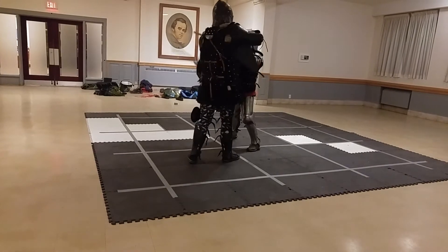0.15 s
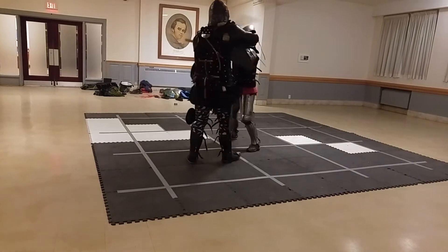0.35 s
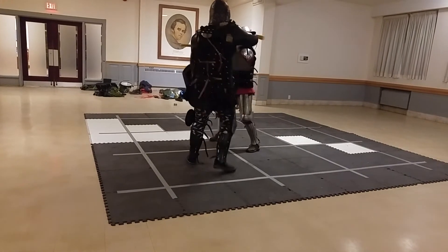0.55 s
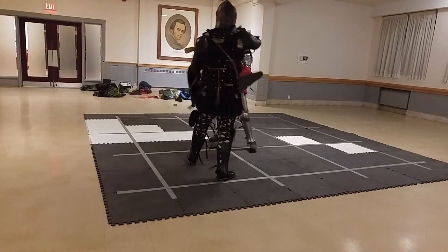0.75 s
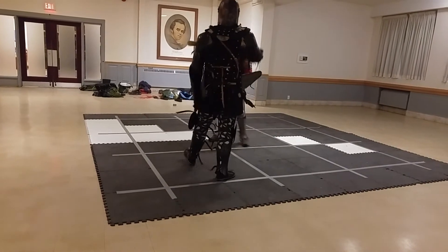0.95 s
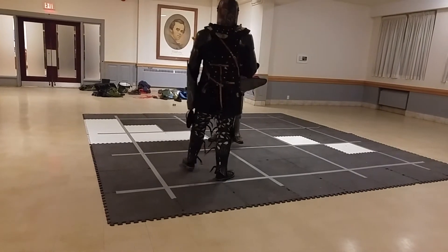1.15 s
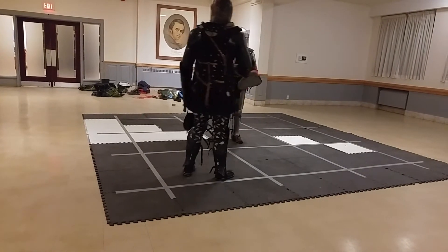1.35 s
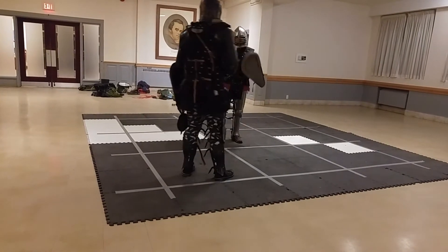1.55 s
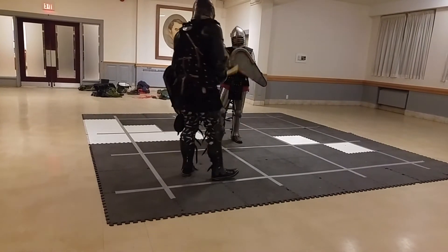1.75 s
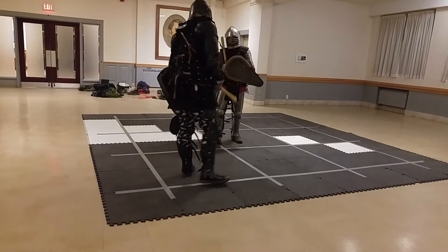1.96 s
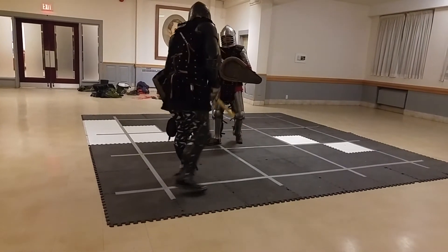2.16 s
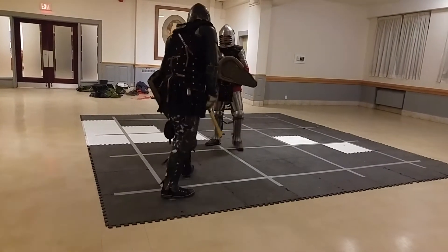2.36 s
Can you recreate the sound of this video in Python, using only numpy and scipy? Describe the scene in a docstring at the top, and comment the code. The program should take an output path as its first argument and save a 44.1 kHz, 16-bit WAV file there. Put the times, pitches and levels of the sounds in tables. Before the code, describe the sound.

Steel plate armour clanks and chatters in an echoing hall. Light jingling and small clinks lead to a hard, bright metal blow at 0.35 s, overloading the microphone, with a hollow thud and low buffet. Ringing fades over a heavy step near 0.5 s. A duller shield knock lands around 0.86 s, another clank at 1.36 s, then loose jingling thins to faint clinks after 1.6 s, over a faint room hush.

```python
"""Armour clanks, chatters and jingles in an echoing hall; a hard sword blow overloads the microphone.
A duller knock lands on a shield, and the two fighters in steel plate step apart on their mats.
Steel is modal synthesis: runs of random contacts excite damped plate modes and a noise tick.
Knocks, thuds, a low buffet, a step and a faint hush are shaped noise. The hall convolves steel and
knocks with decaying noise; the microphone saturates; a low-pass leaves nothing above about 16 kHz."""
import sys
import numpy as np
from scipy import signal
from scipy.fft import rfft, irfft
from scipy.io import wavfile

SR = 44100
rng = np.random.default_rng(int(sys.argv[2]) if len(sys.argv) > 2 else 0)


def dump_mix(stems):
    """Bounce the given channels to the path in sys.argv[1] as a 16-bit WAV at rate SR."""
    frames = np.atleast_2d(stems).T  # one column per channel
    limited = np.clip(frames, -1, 1)  # hard clip at full scale
    pcm = np.round(limited * 32767).astype(np.int16)
    wavfile.write(sys.argv[1], SR, pcm)


N = 105840

# how much the fighters move: start_s, jingle_db (relative)
MOTION = [(0, -25.5), (.3, -25), (.55, -37), (.8, -28), (1.05, -30.5), (1.25, -28), (1.5, -25.5),
          (1.7, -38), (1.95, -36), (2.15, -42.5), (2.4, -30)]
# spectrum of struck steel as the microphone hears it, with a notch near 7750 Hz: frequency_hz, level_db
STEEL_AT_MICROPHONE = [(300, -31), (1000, -6), (1400, -9), (2300, -7.5), (3100, -3.5), (3900, -4),
                       (4900, -2), (6300, -1.5), (7200, -4), (7750, -13), (8400, 1), (9400, -1),
                       (10500, -8), (12500, -12.5), (15500, -36)]

LEAD = SR // 4  # samples before time 0: the scene is already under way
TIME = (np.arange(N + LEAD) - LEAD) / SR  # s
AGE = np.arange(SR // 3) / SR  # s since an impact
LEVEL_WINDOW_S = .05  # an event's level is its RMS if spread over this time
STEEL_ALIKE, CONTACT_ALIKE, KNOCK_ALIKE = 0.036, 0.011, 0.73  # left-right correlation


def from_db(db):
    """Amplitude gain is ten to the power of decibels over twenty."""
    return 10 ** (np.asarray(db) / 20)


def event_gain(db):
    """An event of energy 1 gets the energy that this level holds over the level window."""
    return from_db(db) * np.sqrt(LEVEL_WINDOW_S * SR)


def unit(x):
    """Energy is the sum of squares: scale each channel to energy 1."""
    return x / np.sqrt(np.sum(x ** 2, axis=-1, keepdims=True) + 1e-20)


def at_hz(points, hz):
    """Hearing spaces pitch by ratios: interpolate a table on a log-frequency axis."""
    frequency, value = np.transpose(points)
    return np.interp(np.log(np.maximum(hz, 1)), np.log(frequency), value)


def pan(left_right_db):
    """Level-difference panning: left and right gains of mean power 1."""
    gains = from_db(np.array([[left_right_db], [-left_right_db]]) / 2)
    return gains / np.sqrt(np.mean(gains ** 2))


def colour(x, points):
    """Linear filtering in the frequency domain gives a sound the tabled spectrum."""
    n = x.shape[-1]
    hz = np.arange(n + 1) * SR / (2 * n)
    return irfft(rfft(x, 2 * n) * from_db(at_hz(points, hz)))[..., :n]


def focus(x, hz, lift_db, width_ratio):
    """A resonance lifts a band round one pitch; its width is a fraction of that pitch."""
    resonator = signal.iirpeak(hz, 1 / width_ratio, fs=SR)
    return x + (from_db(lift_db) - 1) * signal.lfilter(*resonator, x)


def butterworth(x, order, hz, kind="low"):
    """A Butterworth filter passes its band with a maximally flat response."""
    return signal.sosfilt(signal.butter(order, hz, kind, fs=SR, output="sos"), x)


def add(out, s, sound):
    """Superposition: mix a sound in at a time in seconds."""
    start = max(0, LEAD + int(s * SR))
    part = sound[..., :max(0, out.shape[-1] - start)]
    out[..., start:start + part.shape[-1]] += part


def contacts(rate, spread_db, n):
    """Random touches: a Bernoulli impulse train of uneven force and either sign."""
    force = from_db(spread_db * np.minimum(rng.exponential(1, n), 4))
    return (rng.random(n) < rate / SR) * rng.choice([-1, 1], n) * force


def stereo_noise(alike, n):
    """Mid and side noises combine into two channels of the given correlation."""
    mid, side = rng.standard_normal((2, n))
    return np.sqrt(1 + alike) * mid + np.sqrt(1 - alike) * side * np.array([[1], [-1]])


def hush():
    """A steady, diffuse sound field: coloured noise, partly alike in both channels."""
    # frequency_hz, level_db
    hush_spectrum = [(25, -38), (60, 0.5), (120, 11), (230, 6), (500, 2.5), (750, 9), (1500, -3),
                     (5000, -25), (15000, -17)]
    noise = colour(stereo_noise(KNOCK_ALIKE, len(TIME)), hush_spectrum)
    return from_db(-47.5) * np.sqrt(len(TIME)) * unit(noise)


def plate_modes(count=260):
    """Modal vibration: decaying sines for each strong mode and many weak, quickly damped ones."""
    # strongest plate modes: frequency_hz, level_db, t60_s (nominal)
    strong_modes = [(2456, -6, 0.96), (3470, 5, .5), (3940, -33, 0.37), (4600, 2, 0.56), (5100, 9, .5),
                    (5620, -4, 0.36), (6110, 7, 0.36), (6840, 14, .5), (8400, 6, 0.3), (8690, -2, 0.34),
                    (9600, 17, 0.68)]
    fine_t60_s = 0.04 * np.exp(.5 * rng.standard_normal(count))  # median 0.04 s

    def rings(hz, db, t60):
        decay = np.exp(-np.log(1000) * AGE / t60[:, None])
        return from_db(db)[:, None] * np.sin(2 * np.pi * hz[:, None] * AGE) * decay

    fine_hz = np.linspace(1100, 15000, count) + rng.uniform(-25, 25, count)
    fine_db = at_hz(STEEL_AT_MICROPHONE, fine_hz)
    return rings(*np.transpose(strong_modes)), rings(fine_hz, fine_db, fine_t60_s)


def touch(strong, fine):
    """Impact on a plate: a tick, and modes whose pitch and decay scale with plate size."""
    modes_db, fine_db, tick_db = -9, -1, 9
    tick_decay_s, size_spread = 0.0014, .035
    size = 1 + size_spread * rng.uniform(-1, 1)

    def struck(rings):
        # each mode gets a new random strength towards each side
        sides = stereo_noise(CONTACT_ALIKE, len(rings)) @ rings
        return unit(np.array([np.interp(AGE / size, AGE, side) for side in sides]))

    noise = colour(stereo_noise(CONTACT_ALIKE, len(AGE)), STEEL_AT_MICROPHONE)
    tick = unit(noise * np.exp(-AGE / tick_decay_s))
    return from_db(modes_db) * struck(strong) + from_db(fine_db) * struck(fine) + from_db(tick_db) * tick


def jingle(modes, count=10):
    """Random light impacts: loose plates and buckles keep touching as the fighters move."""
    rate_per_s, spread_db, pan_db = 330, 4.3, -1
    cut_hz = 11800  # light touches are duller than blows
    n = len(TIME)
    x = 0
    for _ in range(count):
        touches = contacts(rate_per_s / count, spread_db, n)
        x = x + signal.oaconvolve(touches[None], touch(*modes), axes=-1)[:, :n]
    movement = from_db(np.interp(TIME, *np.transpose(MOTION)))
    return unit(butterworth(x, 4, cut_hz)) * np.sqrt(n) * movement * pan(pan_db)


def jostle():
    """Damped random impacts: shields and padding bump softly against the moving bodies."""
    # frequency_hz, level_db
    padding_spectrum = [(90, -28), (300, -1), (500, -13.5), (740, 1), (1100, -9), (3000, -33)]
    bumps_per_s, spread_db, relative_db = 260, 1.5, -1.5
    x = colour(contacts(bumps_per_s, spread_db, len(TIME)), padding_spectrum)
    movement_db = np.interp(TIME, *np.transpose(MOTION))
    return unit(x) * np.sqrt(len(TIME)) * from_db(relative_db + movement_db)


def burst(points, decay_s):
    """Heavy damping: one push and a short noise shudder, through a minimum-phase colour."""
    shudder_db = 5  # against the first push
    x = from_db(shudder_db) * unit(rng.standard_normal(len(AGE)) * np.exp(-AGE / decay_s))
    x[0] += 1
    log_gain = np.log(from_db(at_hz(points, np.fft.rfftfreq(len(AGE), 1 / SR))))
    # folding the cepstrum onto positive times gives minimum phase: nothing sounds early
    causal = irfft(log_gain) * (1 + np.sign(len(AGE) // 2 - np.arange(len(AGE))))
    return unit(irfft(rfft(x) * np.exp(rfft(causal))))


def knocks():
    """Damped body resonance: each shield, padding or foot knock is a hollow crack over a low thud."""
    # start_s, knock_db, knock_pitch_hz, thud_db, thud_pitch_hz (levels relative)
    knock_events = [(-.025, -11.5, 782, -18.5, 228), (.21, -20, 756, -29, 192),
                    (0.3453, -14, 635, -14, 345), (.361, -20, 970, -13.5, 250),
                    (.394, -18, 885, -15.5, 394), (.469, -21, 566, -24, 320), (.505, -23.5, 640, -26, 147),
                    (0.8573, -14.5, 863, -19, 250), (.868, -18.5, 730, -19, 310),
                    (.911, -20.5, 773, -20.5, 298), (1.358, -21, 793, -29.5, 303),
                    (1.813, -32, 790, -28.5, 380), (2.3085, -24.5, 864, -62, 355),
                    (2.333, -25.5, 1290, -27, 420)]
    # hollow crack before it is moved to its pitch: frequency_hz, level_db
    hollow_spectrum = [(200, -18), (500, -13.5), (630, 1.5), (780, 3.5), (1020, -7), (1300, -18),
                       (2000, -13.5), (5000, -36)]
    # frequency_hz, level_db
    thud_spectrum = [(30, -10), (70, -18), (140, -4.5), (200, -3), (290, 0.5), (370, 2), (520, -7.5),
                     (1000, -5.5), (3000, -55)]
    hollow_hz = 780  # the pitch of the hollow spectrum
    knock_decay_s, thud_decay_s = 0.0053, 0.016
    thud_top_ratio = 1.78  # a thud dies away above this multiple of its pitch
    out = np.zeros((2, len(TIME)))
    for s, knock_db, knock_hz, thud_db, thud_hz in knock_events:
        moved = [(hz * knock_hz / hollow_hz, db) for hz, db in hollow_spectrum]
        knock = burst(moved, knock_decay_s)
        soft = butterworth(burst(thud_spectrum, thud_decay_s), 2, thud_top_ratio * thud_hz)
        thud = unit(focus(soft, thud_hz, lift_db=4, width_ratio=.7))
        add(out, s, event_gain(knock_db) * knock + event_gain(thud_db) * thud)
    return butterworth(out, 2, 76, "high")


def clanks(modes, count=2):
    """Repeated impact: plates meet at a few places and chatter in a dying run of contacts."""
    # plates clash: start_s, level_db (relative), chatter_decay_s, brightest_pitch_hz
    clank_events = [(-.02, -24.5, 0.029, 8000), (0.087, -26.5, 0.01, 5440), (.093, -21, 0.0044, 5200),
                    (0.114, -30, .002, 5600), (.168, -27, 0.025, 6700), (.210, -20, 0.0046, 6750),
                    (.213, -18.5, 0.015, 6700), (0.254, -20.5, 0.024, 6300), (0.297, -23, 0.012, 9500),
                    (0.345, -1.5, 0.013, 9560), (.363, -4.5, 0.033, 6100), (.395, -9, 0.0089, 4730),
                    (0.47, -20.5, 0.0033, 5650), (0.508, -20.5, 0.0032, 6100), (0.861, -20, 0.004, 7300),
                    (0.866, -25.5, 0.0028, 6640), (0.879, -22, 0.043, 8200), (0.915, -21.5, 0.026, 6350),
                    (0.963, -29.5, 0.0074, 8250), (1.13, -23, 0.048, 8100), (1.170, -22, 0.0093, 8200),
                    (1.205, -27, 0.06, 8700), (1.359, -16.5, 0.017, 7150), (1.425, -23.5, 0.081, 5770),
                    (1.471, -20, .024, 5550), (1.631, -46, 0.012, 4860), (1.748, -31.5, 0.067, 7200),
                    (1.8, -25, 0.049, 9100), (1.885, -32.5, 0.0089, 6740), (1.977, -37, 0.003, 8900),
                    (2.009, -35, 0.024, 9000), (2.197, -38, 0.028, 8100), (2.221, -35, 0.0095, 8500),
                    (2.267, -33, 0.05, 8440), (2.3085, -28.5, 0.0021, 9300), (2.3325, -26.5, 0.0028, 8400),
                    (2.354, -27, 0.0076, 8200), (2.384, -27.5, .03, 7000)]
    contacts_per_s, spread_db, rise_s = 1100, 2.9, 0.0011
    first_contact = 1.3  # amplitude
    out = np.zeros((2, len(TIME)))
    for s, db, decay_s, hz in clank_events:
        x = 0
        for _ in range(count):
            run = contacts(contacts_per_s / count, spread_db, len(AGE))
            run = run * np.exp(-AGE / decay_s) * (1 - np.exp(-AGE / rise_s))
            run[0] += first_contact
            x = x + signal.fftconvolve(run[None], touch(*modes), axes=-1)[:, :len(AGE)]
        add(out, s, event_gain(db) * unit(focus(x, hz, lift_db=7, width_ratio=0.31)))
    return out


def hall(x, early_db, wet_db, alike, count=14):
    """Reverberation: direct sound, scattered near reflections and a tail whose top dies fastest."""
    # reverberation time: frequency_hz, t60_s
    hall_decay = [(130, 0.68), (300, 0.65), (800, 1.335), (2500, 1.73), (5000, 1), (9000, 0.84),
                  (15000, 0.22)]
    early_decay_s, wall_delay_s, early_per_s = 0.016, 0.013, 1500
    t = np.arange(SR * 3 // 2) / SR
    noise, hz = rfft(stereo_noise(alike, len(t))), np.fft.rfftfreq(len(t), 1 / SR)
    edges_hz = np.geomspace(40, SR / 2, count + 1)
    tail = 0
    for lo, hi in zip(edges_hz, edges_hz[1:]):
        band = irfft(noise * ((hz >= lo) & (hz < hi)))
        tail = tail + band * from_db(-60 * t / at_hz(hall_decay, np.sqrt(lo * hi)))
    tail = tail * (1 - np.exp(-(t / wall_delay_s) ** 2))  # the tail builds up gradually
    reflections = rng.random(len(t)) < early_per_s / SR
    early = stereo_noise(alike, len(t)) * reflections * np.exp(-t / early_decay_s)
    response = from_db(wet_db) * unit(tail) + from_db(early_db) * unit(early)
    return x + signal.fftconvolve(x, response, axes=-1)[:, :len(TIME)]


def port_balance(steel):
    """Frequency-dependent level difference: steel as the two microphones hear it."""
    # frequency_hz, left_right_db
    balance = [(1000, 1.5), (2800, 2), (4200, -2), (5300, -7), (6600, -6.5), (8200, -1), (10000, -.5),
               (13000, -1)]
    left = colour(steel[0], [(hz, db / 2) for hz, db in balance])
    right = colour(steel[1], [(hz, -db / 2) for hz, db in balance])
    return np.array([left, right])


def boom():
    """Band-limited noise under a brief envelope: a low buffet with the hard blow, mostly right."""
    start_s, rise_s, sag_s, hold_s, release_s = .354, 0.0039, .06, .055, .012
    level_db, pan_db, alike = -20.5, -19, .1
    x = butterworth(stereo_noise(alike, len(TIME)), 2, [25, 100], "band")
    age = TIME - start_s
    sag = np.maximum(age, 0) / sag_s
    release = np.maximum(age - hold_s, 0) / release_s  # after the hold it dies faster
    envelope = np.clip(age / rise_s, 0, 1) * np.exp(-sag - release)
    return event_gain(level_db) * unit(x * envelope) * pan(pan_db)


def free_rings(count=4):
    """Beating of close modes: a plate that swings free after a clank rings on in a cluster."""
    # start_s, level_db (relative), pitch_hz
    ring_events = [(.395, -23, 4780), (.866, -30, 6630), (.914, -27.5, 6700), (1.471, -29.5, 4450),
                   (1.471, -31, 5060)]
    t60_s, split_hz = 0.1, 33.6  # split to either side of the pitch
    out = np.zeros((2, len(TIME)))
    for s, db, hz in ring_events:
        cluster_hz = hz + split_hz * np.linspace(-1, 1, count)
        phase = rng.uniform(0, 2 * np.pi, (count, 1))
        sines = np.sin(2 * np.pi * cluster_hz[:, None] * AGE + phase)
        x = stereo_noise(CONTACT_ALIKE, count) @ sines
        add(out, s, event_gain(db) * unit(x * np.exp(-np.log(1000) * AGE / t60_s)))
    return out


def footfall():
    """Low resonance: a heavy step after the blow sets floor and hall droning, as decaying band noise."""
    start_s, decay_s, level_db = .495, .15, -33
    age = np.maximum(TIME - start_s, 0)
    push = stereo_noise(KNOCK_ALIKE, len(TIME)) * (age > 0) * np.exp(-age / decay_s)
    return event_gain(level_db) * unit(butterworth(push, 2, [115, 165], "band"))


def scene():
    """Superposition: armour and knocks in the hall, with buffet, step and faint hush."""
    modes = plate_modes()
    dry_steel = clanks(modes) + free_rings() + jingle(modes)
    steel = port_balance(hall(dry_steel, early_db=0, wet_db=-5.5, alike=STEEL_ALIKE))
    dull = hall(knocks() + jostle(), early_db=-4.5, wet_db=-1, alike=KNOCK_ALIKE)
    mix = from_db(-6.5) * steel + from_db(-13.5) * dull + boom() + footfall() + hush()
    return mix[:, LEAD:]


def record(dry):
    """Saturation: the microphone overloads; a steep low-pass leaves nothing above about 16 kHz."""
    stop_hz = 15700 + 600  # 60 dB down from here
    low_pass = signal.cheby2(14, 60, stop_hz, fs=SR, output="sos")
    return signal.sosfilt(low_pass, np.tanh(dry))


dry = scene()
out = record(dry)
dump_mix(out)
```